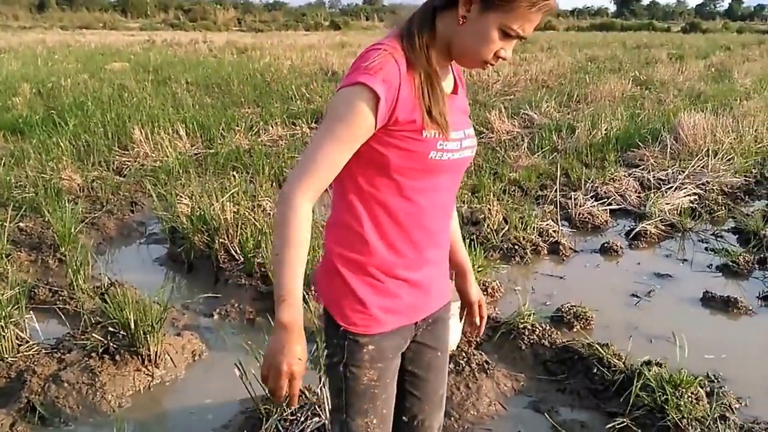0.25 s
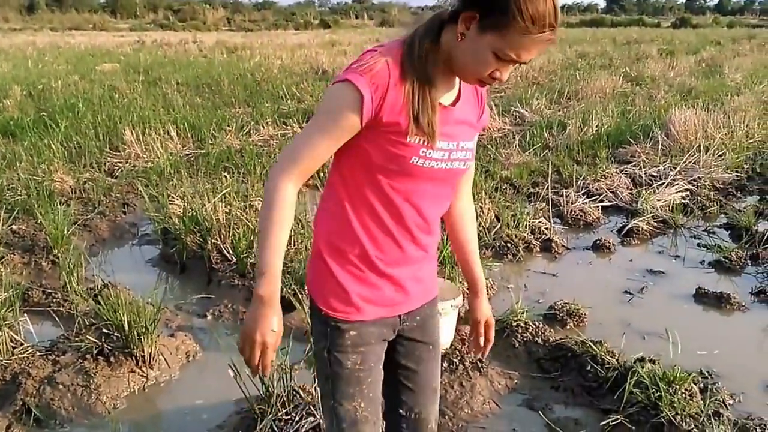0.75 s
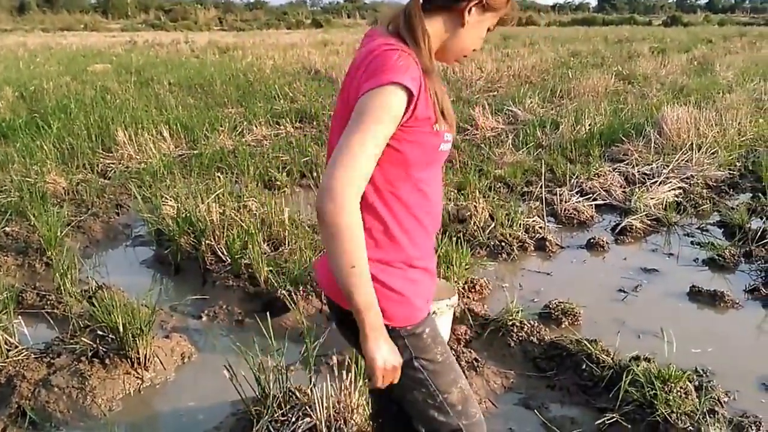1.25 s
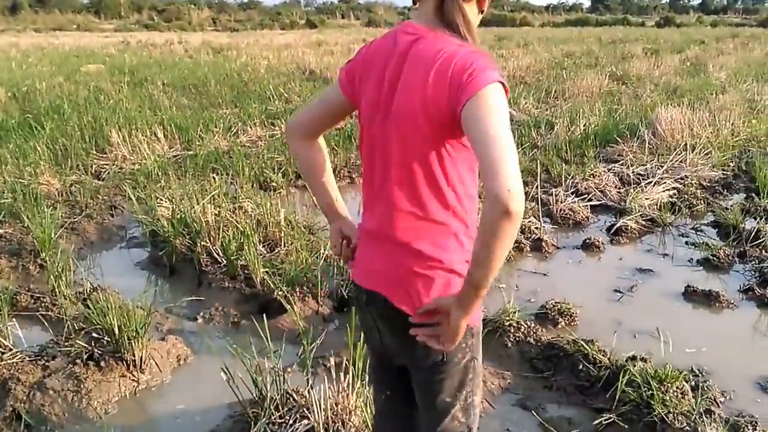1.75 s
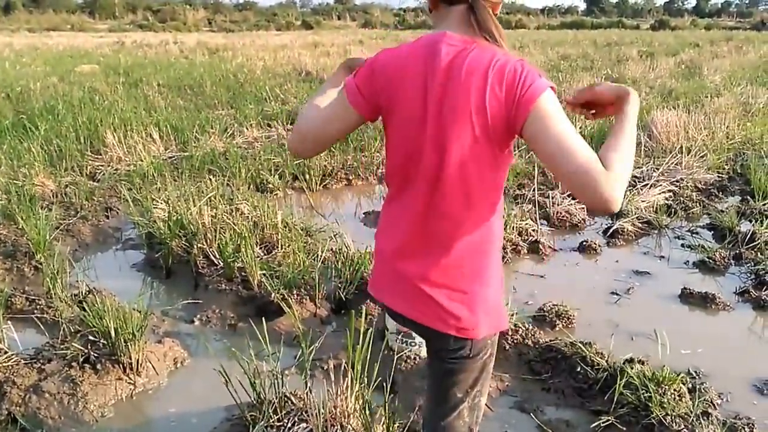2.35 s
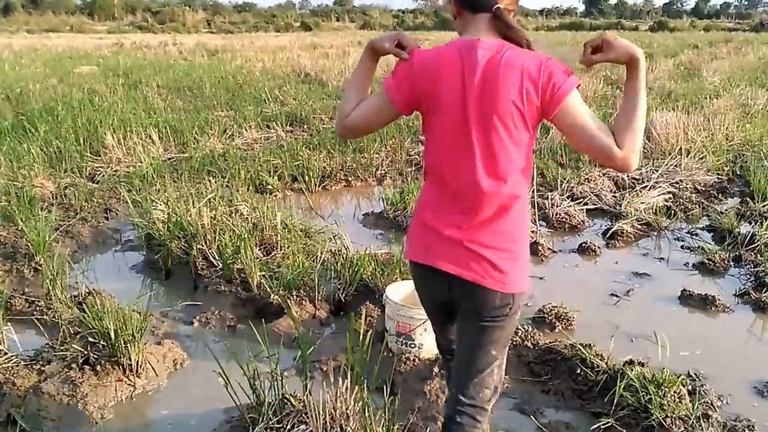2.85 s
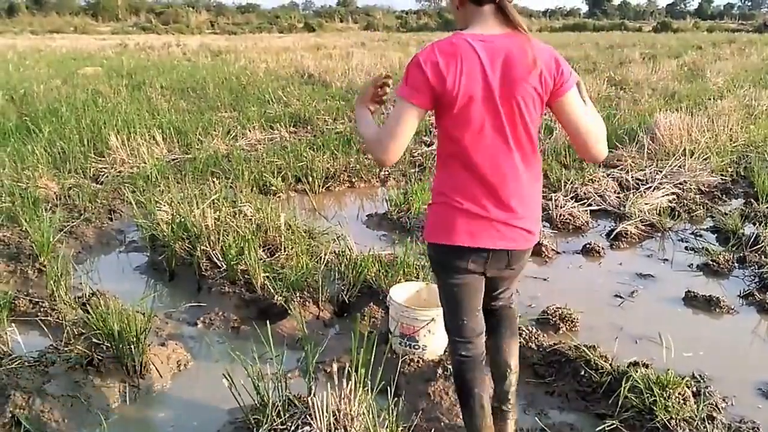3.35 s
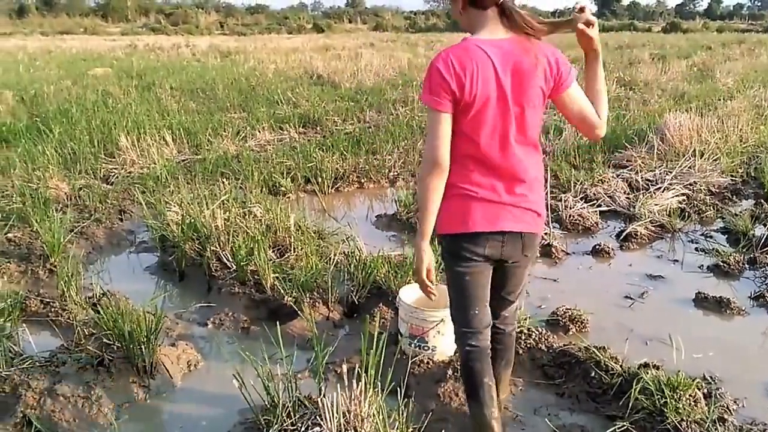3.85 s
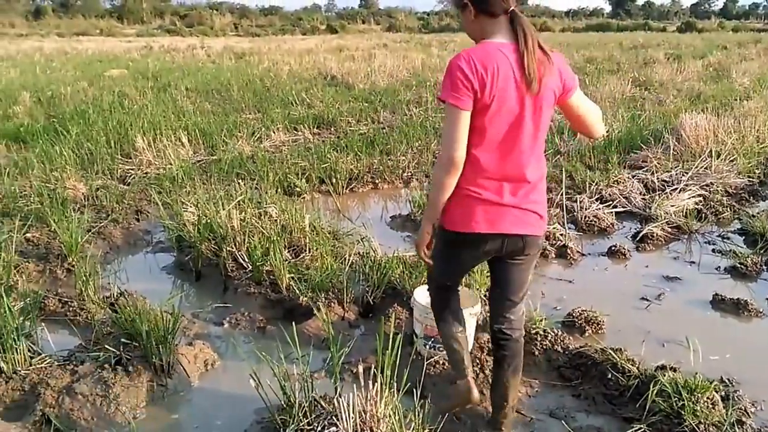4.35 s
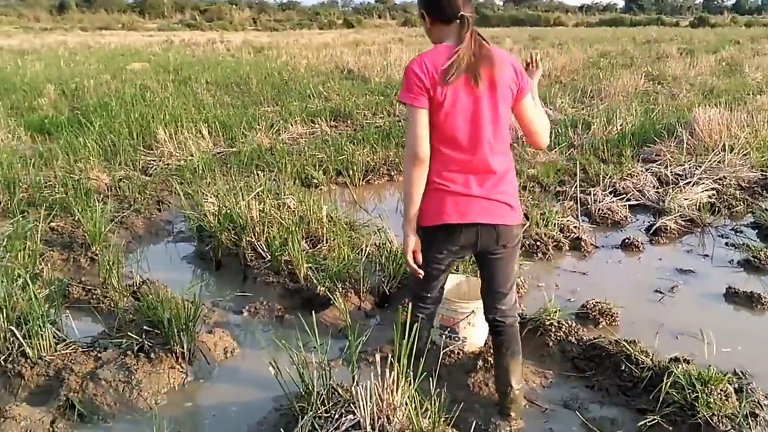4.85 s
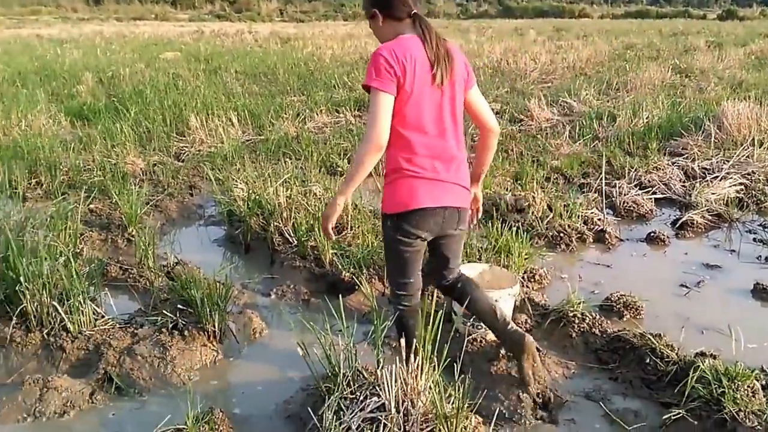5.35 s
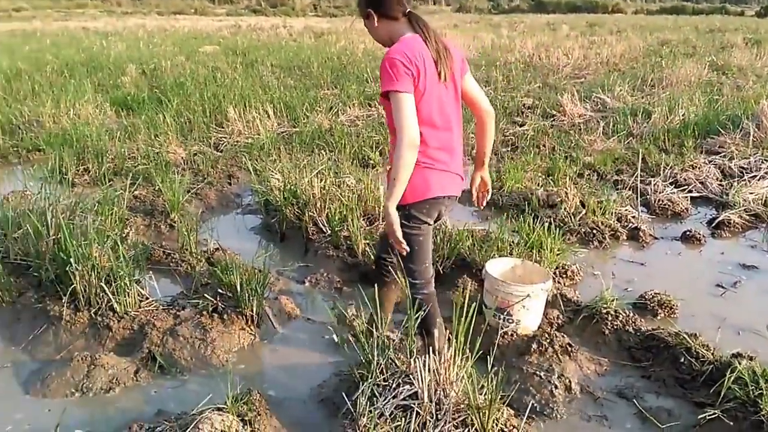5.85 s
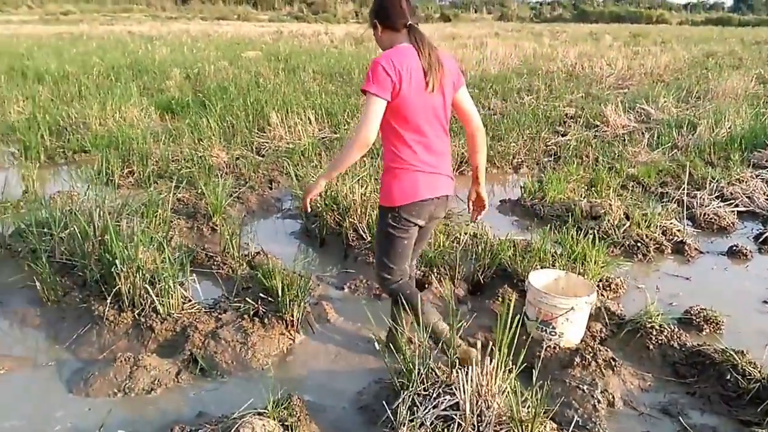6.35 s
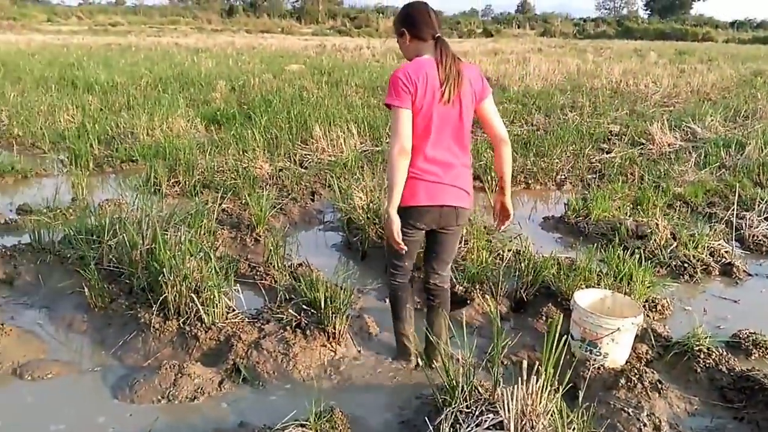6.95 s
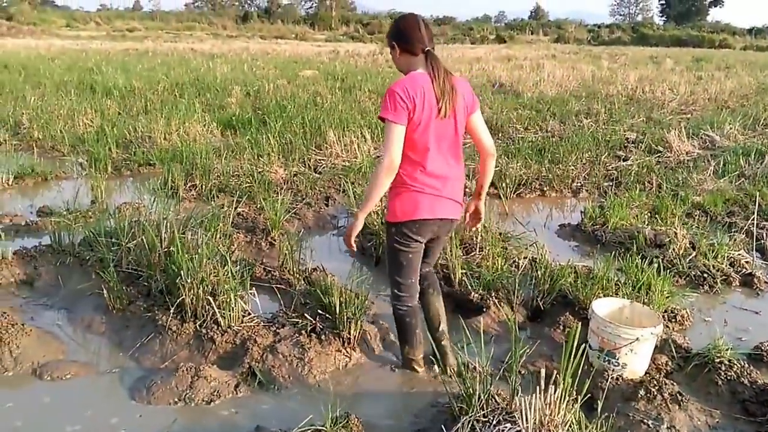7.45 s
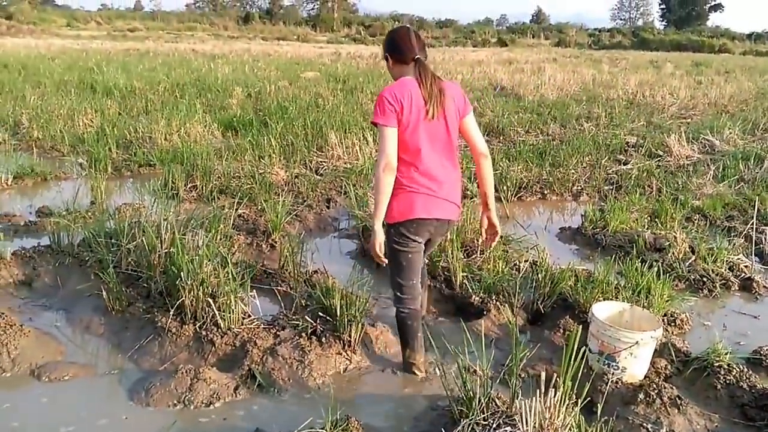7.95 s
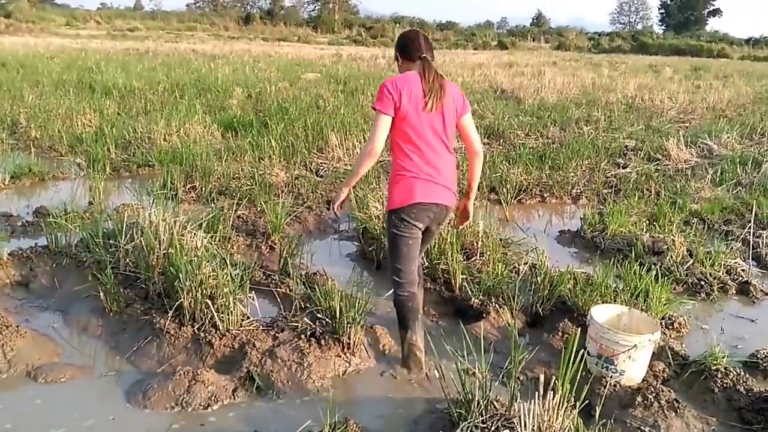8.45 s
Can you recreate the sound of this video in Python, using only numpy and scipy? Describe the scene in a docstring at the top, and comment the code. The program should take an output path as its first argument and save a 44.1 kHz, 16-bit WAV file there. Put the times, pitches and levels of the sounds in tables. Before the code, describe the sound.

Someone wades slowly through shallow, muddy water in an open field. A busy cluster of sloshes, hollow plops and sharp wet smacks comes early, then sparser steps with small drips and bubble snaps. Thin bird trills recur, and a lively twitter builds from about three seconds. Faint insects hiss and wind thumps softly on the close outdoor microphone.

```python
"""Wading through a flooded field

Feet slosh in shallow water, mud sucks and smacks: swarms of ringing bubbles, single air pockets, noise bursts.
Wind buffets the microphone as low filtered noise with single pressure dips; field, air and insects are
shaped noise. Birds twitter, trill, cheep and pip as gliding tones with short diffuse tails."""
import sys
import numpy as np
from scipy import signal
from scipy.fft import rfft, irfft
from scipy.io import wavfile
from scipy.ndimage import uniform_filter1d, map_coordinates

SR = 44100
rng = np.random.default_rng(int(sys.argv[2]) if len(sys.argv) > 2 else 0)


def generate_wav(sig):
    """Save sig (samples, or channels by samples) to the path in sys.argv[1] as 16-bit PCM at SR."""
    pcm = np.round(np.clip(np.atleast_2d(sig).T, -1, 1) * 32767).astype(np.int16)
    wavfile.write(sys.argv[1], SR, pcm)


N = 383669
TIME = np.arange(N) / SR


def from_db(db):
    """Amplitude factor of a level in dB."""
    return 10 ** (np.asarray(db) / 20)


def rms_one(x):
    """Scale to rms 1."""
    return x / np.sqrt(np.mean(x ** 2) + 1e-20)


def in_time(rows):
    """Each column of a curve, interpolated at every sample."""
    knot_s, *columns = np.transpose(rows)
    return [np.interp(TIME, knot_s, column) for column in columns]


def add(out, start_s, sound):
    """Mix a sound in at start_s."""
    at = int(np.clip(round(start_s * SR), 0, N))
    out[at:at + len(sound)] += sound[:N - at]


def colour(x, spectrum):
    """Causal (minimum-phase) filter with the given spectrum; rms 1."""
    size = 16384
    hz, db = np.transpose(spectrum)
    log_hz = np.log(np.maximum(np.fft.rfftfreq(size, 1 / SR), 1))
    below = np.maximum(np.log(hz[0]) - log_hz, 0)
    above = np.maximum(log_hz - np.log(hz[-1]), 0)
    level_db = np.interp(log_hz, np.log(hz), db) - 30 * (below + above)
    # folding the cepstrum makes the phase minimum
    cepstrum = irfft(np.log(from_db(level_db)), size)
    cepstrum[1:size // 2] *= 2
    cepstrum[size // 2 + 1:] = 0
    response = irfft(np.exp(rfft(cepstrum)), size)
    return rms_one(signal.oaconvolve(x, response)[:N])


def noise(spectrum):
    """Random noise with the given spectrum; rms 1."""
    return colour(rng.standard_normal(N), spectrum)


def even(x, span_s):
    """Level held near rms 1 over a sliding span."""
    power = uniform_filter1d(x ** 2, max(int(span_s * SR), 2))
    return x / np.sqrt(np.abs(power) + 1e-6)


def drift(rate_hz):
    """Smooth chance through about rate_hz random knots a second; spread near 1."""
    knots = rng.standard_normal(4000)
    coarse = map_coordinates(knots, [TIME[::32] * rate_hz], order=3, mode="wrap")
    return coarse.repeat(32)[:N]


def glide(hz):
    """Sine following a frequency curve."""
    return np.sin(2 * np.pi * np.cumsum(hz) / SR)


def bubble(start_hz, end_hz, length_s, attack=0.074, damping=3.75):
    """An air pocket rings and dies, its pitch moving as it nears the surface."""
    u = np.arange(int(2 * length_s * SR) + 2) / (length_s * SR)
    swell = np.sin(np.pi / 2 * np.minimum(u / attack, 1)) ** 2
    hz = start_hz * (end_hz / start_hz) ** np.minimum(u, 1.3)
    return glide(hz) * swell * np.exp(-damping * u * u)


def note(length_s, start_hz, middle_hz, end_hz, vary=0.013):
    """A bird's near-pure note bending through three pitches, all shifted by chance."""
    u = np.linspace(0, 1, int(length_s * SR))
    bend = np.polyfit([0, .5, 1], [start_hz, middle_hz, end_hz], 2)
    hz = np.polyval(bend, u) * (1 + vary * rng.standard_normal())
    return glide(hz) * np.sin(np.pi * u)


def scatter(x, t60_s, wet_db):
    """Adds a short diffuse tail of decaying noise."""
    t = np.arange(SR // 2) / SR
    tail = rng.standard_normal(len(t)) * from_db(-60 * t / t60_s) * (t > .004)
    return x + from_db(wet_db) * signal.fftconvolve(x, tail / np.linalg.norm(tail))[:N]


# Light air between gusts. Each row: time in seconds, relative rumble level in dB.
BREEZE_CURVE = [(0.0, -45), (0.34, -53.5), (4.02, -52), (4.24, -46.5), (6.08, -58), (6.3, -45), (7.53, -48),
                (7.88, -59), (8.7, -53)]
# Gusts on the microphone. Each row: peak time in seconds, length in seconds (1/e width of power),
# relative rumble level in dB, turbulence against rumble in dB.
GUST_EVENTS = [(0.01, 0.033, -38, -11.5), (0.132, 0.056, -32.5, -17), (0.35, 0.066, -43, -20),
               (0.552, 0.061, -42, -17), (0.902, 0.089, -44.5, -13.5), (1.54, 0.064, -49, -6.5),
               (1.83, 0.11, -49, -22), (1.981, 0.034, -41.5, -25), (2.335, 0.054, -61, -33),
               (2.703, 0.05, -36.5, -5), (2.994, 0.16, -47.5, -16), (3.333, 0.054, -46.5, -14),
               (3.522, 0.033, -47.5, -18), (3.74, 0.053, -44.5, -13), (3.863, 0.041, -43, -19),
               (4.218, .15, -39, -13.5), (4.41, 0.096, -39, -11.5), (4.723, 0.062, -37, -16.5),
               (4.928, 0.13, -44.5, -7.5), (5.529, 0.076, -47.5, -29), (6.204, .16, -38, -27),
               (6.458, 0.1, -36.5, -14), (6.605, 0.1, -33, 1.5), (6.908, 0.021, -38.5, -26),
               (7.126, 0.075, -29, -4), (7.385, 0.047, -36.5, -0.5), (7.455, 0.13, -37.5, -7),
               (7.934, 0.029, -48.5, 1.5), (8.301, 0.093, -44, -4), (8.526, 0.042, -43, -15)]


def gusting():
    """Levels of rumble and turbulence: bell-shaped gusts ride on a fluttering breeze."""
    breeze_db = in_time(BREEZE_CURVE)[0] - 0.5 + 3.5 * drift(12)
    rumble = from_db(breeze_db) ** 2
    rough = rumble * from_db(-16) ** 2
    for peak_s, length_s, db, rough_db in GUST_EVENTS:
        near = np.abs(TIME - peak_s) < 2 * length_s
        power = from_db(db) ** 2 * np.exp(-(2 * (TIME[near] - peak_s) / length_s) ** 2)
        rumble[near] += power
        rough[near] += power * from_db(rough_db) ** 2
    return np.sqrt([rumble, rough])


# Spectrum of the wind's rumble. Each row: frequency in Hz, relative level in dB per Hz.
RUMBLE_SPECTRUM = [(22, -45.5), (32, -13.5), (45, -9.5), (58, -0.5), (75, -8.5), (110, -18.5), (150, -27),
                   (250, -48.5)]
# Spectrum of the wind's turbulence. Each row: frequency in Hz, relative level in dB per Hz.
TURBULENCE_SPECTRUM = [(80, -26), (130, 9), (190, -4), (260, -10.5), (360, -17.5), (500, -30.5), (900, -31)]
# Hardest eddies thumping the microphone. Each row: time in seconds, relative peak in dB, width in seconds.
BUFFET_EVENTS = [(2.684, -27.5, 0.0038), (2.715, -24.5, 0.0033), (3.323, -31.5, 0.0058),
                 (6.556, -24.5, 0.0018), (6.621, -23, 0.0015), (7.101, -27.5, 0.00065),
                 (7.127, -17, 0.0012), (7.15, -22.5, 0.0014)]


def wind():
    """Lumpy low rumble, rougher turbulence in the gusts, and single pressure dips."""
    rumble, rough = gusting()
    out = from_db(0.56) * rumble * even(noise(RUMBLE_SPECTRUM), 0.0685)
    out += from_db(-6.0) * rough * even(noise(TURBULENCE_SPECTRUM), 0.073)
    for centre_s, db, width_s in BUFFET_EVENTS:
        u = np.arange(-4, 4, 1 / (width_s * SR))
        dip = (u * u - 1) * np.exp(-u * u / 2)
        add(out, centre_s - 4 * width_s, from_db(db - 1.5) * dip)
    return out


# Spectrum of the distant field. Each row: frequency in Hz, relative level in dB per Hz.
FIELD_SPECTRUM = [(150, 1), (420, -13), (680, -7), (930, -4), (1100, -13.5), (1500, -16), (2300, -20.5),
                  (3000, -15.5), (4200, -29), (5300, -12.5), (6600, -29)]
# Swell of the background. Each row: time in seconds, field change in dB, insect change in dB.
BACKGROUND_SWELL = [(0, 2, -3), (1.2, 3.5, 3.5), (2.1, -1.5, -1), (3.0, 6, 0), (3.8, 3, 1),
                    (4.8, 5.5, -4.5), (6, 9, 0.5), (7.3, 9, 1.5), (8.7, 3, -1.5)]


def field():
    """Distant field: shaped noise, slowly swelling."""
    return from_db(-77.5 + in_time(BACKGROUND_SWELL)[0]) * noise(FIELD_SPECTRUM)


# Spectrum of the insect hiss. Each row: frequency in Hz, relative level in dB per Hz.
INSECT_SPECTRUM = [(5500, -19.5), (6800, -12), (7700, -9.5), (8700, 3.5), (9700, -11), (10500, -7.5),
                   (11800, -19.5), (14400, -27.5)]
# Bush cricket buzzes. Each row: start in seconds, length in seconds, relative level in dB.
BUZZ_EVENTS = [(0.0, .13, -81), (0.685, 0.2, -66.5), (3.593, 0.21, -65), (3.883, 0.23, -65),
               (4.214, 0.12, -66)]
# Spectrum of a buzz. Each row: frequency in Hz, relative level in dB per Hz.
BUZZ_SPECTRUM = [(6200, -73), (7100, -26), (7800, -12.5), (8300, -14), (9200, -45)]


def insects():
    """A high hiss from all over the grass, pulsed by wing strokes, and a few nearer buzzes."""
    buzz = np.zeros(N)
    for start_s, length_s, db in BUZZ_EVENTS:
        add(buzz, start_s, from_db(db) * signal.windows.tukey(int(length_s * SR), .7))
    stroke_hz = 98 * (1 + 0.0505 * drift(13))
    strokes = from_db(1.3 * glide(stroke_hz))
    chorus_db = -72 + in_time(BACKGROUND_SWELL)[1] + 2.1 * drift(22) + 0.83 * drift(11)
    around = from_db(-11) * noise(INSECT_SPECTRUM) * np.array([[1], [-1]])  # opposite in the two ears
    chorus = from_db(chorus_db) * (strokes * noise(INSECT_SPECTRUM) + around)
    return chorus + buzz * strokes * noise(BUZZ_SPECTRUM)


# Spectrum of a thin airy hiss. Each row: frequency in Hz, relative level in dB per Hz.
AIR_SPECTRUM = [(2800, -46), (4500, -13), (7000, 0.5), (8700, -2), (11000, 8), (14400, -1.5)]


def air():
    """Thin steady hiss, independent noise in each ear."""
    return from_db(-85.5) * np.array([noise(AIR_SPECTRUM), noise(AIR_SPECTRUM)])


def grains(per_s, low_hz, high_hz, cycles, spread_db, wash):
    """A swarm of small rising bubbles of random size over a smooth wash."""
    out = np.zeros(N)
    for when, pitch, size, rise in rng.random((int(per_s * N / SR), 4)):
        hz = low_hz * (high_hz / low_hz) ** pitch
        strength = from_db(spread_db * min(-np.log(1 - size), 3.5))
        length_s = cycles * (0.55 + 2.7 * rise) / hz
        add(out, when * N / SR, strength * bubble(hz, hz * (1 + 0.31 * rise), length_s))
    return rms_one(out) + wash * rng.standard_normal(N)


STROKE_ATTACK_S, STROKE_RELEASE_S = 0.031, 0.019
RUNOFF_DB, RUNOFF_S = -7.5, 0.12


def stroke(t, start_s, length_s):
    """A push builds quickly, holds, falls away and leaves water draining off the leg."""
    rise = np.clip((t - start_s) / STROKE_ATTACK_S + .5, 0, 1)
    after_s = np.maximum(t - start_s - length_s, 0)
    release = np.exp(-after_s / STROKE_RELEASE_S)
    runoff = from_db(RUNOFF_DB) * np.exp(-after_s / RUNOFF_S)
    return rise * np.maximum(release, runoff)


# A leg pushes through the water. Each row: start in seconds, length in seconds, relative level in dB,
# spray against body in dB, gurgle against body in dB (both before the layer trims).
STROKE_EVENTS = [(0.68, 0.055, -79, -13, 27.5), (0.779, 0.038, -54.5, 0, -7), (1.016, 0.1, -68, 6, -6),
                 (1.156, 0.17, -69.5, -2, 5.5), (1.248, 0.037, -54, -4.5, -4), (1.328, 0.059, -49, -9, -17),
                 (1.402, 0.13, -57, 4.5, 5.5), (1.495, 0.076, -52, 3, 6.5), (1.618, 0.058, -51, -5, 9),
                 (2.264, 0.09, -57.5, 0, -0.5), (2.339, 0.15, -60.5, 2, -12), (2.698, 0.012, -65, 12, 9.5),
                 (2.817, 0.075, -64, 5.5, 9), (3.183, 0.2, -61, 6, -3), (3.35, .21, -76, 16, 4),
                 (3.569, 0.014, -59.5, 13.5, 11.5), (3.61, .19, -74.5, 12, 9.5),
                 (4.314, 0.033, -69.5, 15.5, 6), (4.778, 0.18, -66.5, 0.5, 3),
                 (5.005, 0.065, -73.5, 13.5, 13), (5.123, 0.047, -70.5, 10.5, 4),
                 (5.31, 0.12, -68.5, 10.5, 4), (5.453, 0.13, -64.5, 4.5, 6.5), (5.801, .08, -56, 4.5, -12),
                 (5.899, 0.068, -54.5, -1, 5), (6.09, .065, -54, 6, -14), (6.462, 0.22, -73, 11.5, 4),
                 (6.666, 0.063, -55.5, 2, -17), (6.756, .15, -54, 2, -16), (6.909, 0.09, -57.5, 3.5, -27),
                 (7.615, 0.22, -73, 12.5, 14), (7.848, 0.056, -54.5, 4, 9), (7.923, .06, -73, -1, 18.5),
                 (8.007, 0.072, -57.5, 2, -1)]


def stirring():
    """Levels of body, spray and gurgle: all strokes add in power over a faint trickle."""
    t = TIME[::32]
    body, spray, gurgle = from_db(-86) ** 2, from_db(-80) ** 2, 0
    for start_s, length_s, db, spray_db, gurgle_db in STROKE_EVENTS:
        power = (from_db(db) * stroke(t, start_s, length_s)) ** 2
        body = body + power
        spray = spray + power * from_db(spray_db) ** 2
        gurgle = gurgle + power * from_db(gurgle_db) ** 2
    return [np.interp(TIME, t, np.sqrt(power)) for power in (body, spray, gurgle)]


# Middle range of the water. Each row: frequency in Hz, relative level in dB per Hz.
SLOSH_SPECTRUM = [(450, -16), (850, -15.5), (1020, -8), (1270, -5.5), (1510, -8.5), (1900, 7.5), (2300, -7),
                  (2700, -10.5), (4000, -7.5)]
# Fine droplets. Each row: frequency in Hz, relative level in dB per Hz.
SPRAY_SPECTRUM = [(2000, -12.5), (3000, -10.5), (4300, -1), (5700, 3), (6400, -9), (7300, -20.5),
                  (8800, -14), (14000, -22)]
# Big air pockets. Each row: frequency in Hz, relative level in dB per Hz.
GURGLE_SPECTRUM = [(180, -6.5), (300, -15.5), (480, -8.5), (780, 2.5), (1000, -11), (1600, -18)]


def wading():
    """Moving legs stir up gurgles, mid-sized bubbles and a fizz of droplets."""
    body_level, spray_level, gurgle_level = stirring()
    # gentle motion gives single drips, a hard push merges them
    wash = np.interp(20 * np.log10(body_level), [-66, -55], [.25, .85])
    bubbles = grains(per_s=750, low_hz=600, high_hz=3600, cycles=10, spread_db=4.8, wash=wash)
    droplets = grains(per_s=1100, low_hz=2400, high_hz=9000, cycles=11, spread_db=5.2, wash=wash)
    pockets = grains(per_s=260, low_hz=250, high_hz=1100, cycles=6, spread_db=3.5, wash=.7)
    drips = grains(per_s=55, low_hz=1100, high_hz=3000, cycles=14, spread_db=2.5, wash=0)
    slosh = from_db(-1.5) * even(colour(bubbles, SLOSH_SPECTRUM), 0.048)
    body = body_level * (slosh + from_db(-9) * colour(drips, SLOSH_SPECTRUM))
    spray = from_db(-4.0) * spray_level * even(colour(droplets, SPRAY_SPECTRUM), .05)
    gurgle = from_db(-10.0) * gurgle_level * even(colour(pockets, GURGLE_SPECTRUM), 0.075)
    lumps = from_db(2.5 * drift(60))  # water breaks unevenly
    return lumps * (body + spray + gurgle)


# Far piping call. Each row: first pip in seconds, number of pips, relative level in dB.
PIPING_CALLS = [(0.019, 4, -60), (0.42, 3, -68.5), (4.91, 8, -65), (6.357, 9, -57.5), (7.274, 3, -52.5),
                (7.586, 11, -52.5)]
PIP_GAP_S, PIP_UNEVEN_DB = .1, 1.5


def piping():
    """Hoarse low pips, ten a second: a slightly rising tone with a shorter rasp of noise."""
    tone, rasp = np.zeros(N), np.zeros(N)
    for start_s, pips, db in PIPING_CALLS:
        for k in range(int(round(pips))):
            pip_s = start_s + k * PIP_GAP_S
            gain = from_db(db + PIP_UNEVEN_DB * rng.standard_normal())
            add(tone, pip_s, gain * note(0.029, 1376, 1483, 1526, vary=0.0082))
            add(rasp, pip_s, gain * np.hanning(int(0.022 * SR)))
    hoarse = noise([(850, -6), (1300, 6), (1600, -4.5), (2100, -38.0), (3100, -16), (3700, -28)])
    return scatter(from_db(-4.0) * tone + from_db(-6) * rasp * hoarse, t60_s=0.17, wet_db=0.5)


# Thin high trill of a second bird. Each row: start in seconds, number of notes, relative level in dB.
TRILL_CALLS = [(0.214, 4, -54.5), (0.844, 5, -70), (1.04, 5, -59.5), (1.826, 9, -58), (2.488, 6, -56.5),
               (2.901, 3, -59.5), (3.471, 3, -58.5), (3.679, 5, -55), (4.366, 3, -56.5), (4.614, 4, -58.5),
               (5.137, 3, -59.5), (5.481, 4, -57.5), (6.404, 4, -56.5), (7.349, 4, -53), (7.565, 3, -56),
               (8.185, 4, -57), (8.414, 6, -57.5)]
TRILL_GAP_S, TRILL_JITTER_S, TRILL_NOTE_S = .039, 0.0015, 0.0245


def trill():
    """Quick series of thin, slightly hoarse falling notes; fast level flutter roughens them."""
    out = np.zeros(N)
    for start_s, notes, db in TRILL_CALLS:
        for k in range(int(round(notes))):
            loud, long, late = rng.standard_normal(3)
            note_s = start_s + k * TRILL_GAP_S + TRILL_JITTER_S * late
            length_s = TRILL_NOTE_S * np.exp(0.16 * long)
            add(out, note_s, from_db(db - 3.0 + 2 * loud) * note(length_s, 5708, 5393, 4860, vary=.012))
    return scatter(out * from_db(3.1 * drift(400)), t60_s=0.23, wet_db=-10.0)


# Faint cheeps of far birds. Each row: start in seconds, relative level in dB, middle pitch in Hz.
CHEEP_EVENTS = [(0.245, -72, 3020), (3.096, -63, 3000), (3.914, -62, 2860), (4.015, -64.5, 2980),
                (4.526, -67, 2890), (5.734, -64.5, 3120), (7.61, -69, 2860), (8.401, -74, 3050),
                (8.508, -63, 3040)]


def cheeps():
    """Distance smears these short rising notes almost into noise."""
    out = np.zeros(N)
    for start_s, db, hz in CHEEP_EVENTS:
        add(out, start_s, from_db(db + 0.5) * note(0.014, 0.82 * hz, hz, 1.03 * hz))
    return scatter(out, t60_s=0.17, wet_db=-3)


# Single air pockets ringing. Each row: start in seconds, relative level in dB, start pitch in Hz,
# pitch after one length in Hz, length in seconds.
PLOP_EVENTS = [(0.725, -46.5, 744, 900, 0.0072), (0.778, -39.5, 730, 1170, 0.018),
               (0.783, -35, 1220, 1600, 0.015), (0.798, -34, 790, 990, 0.014),
               (0.856, -42.5, 1480, 1810, 0.0083), (1.026, -39.5, 1490, 1550, 0.0056),
               (1.231, -36.5, 3000, 3080, 0.0055), (1.298, -33, 850, 750, 0.013),
               (1.318, -34, 655, 1040, 0.023), (1.327, -29, 605, 990, 0.024),
               (1.363, -27, 1550, 2160, 0.0065), (1.368, -41, 746, 638, 0.058),
               (1.404, -41, 664, 566, 0.042), (1.533, -36.5, 244, 410, 0.027),
               (1.585, -40.5, 413, 664, 0.028), (1.624, -30, 850, 925, 0.013),
               (2.229, -38.5, 456, 554, 0.006), (2.23, -31.5, 810, 960, 0.0048),
               (2.274, -44, 1600, 1800, 0.014), (2.358, -27, 789, 807, 0.022),
               (2.391, -43.5, 680, 760, 0.021), (2.447, -35.5, 2000, 2520, 0.0055),
               (2.839, -44, 1910, 2010, .01), (3.045, -44.5, 2950, 2860, 0.0077),
               (2.873, -34.5, 262, 574, 0.046), (2.914, -41.5, 573, 1000, 0.027),
               (3.57, -31.5, 1900, 1960, 0.011), (4.774, -43.5, 590, 710, 0.0081),
               (4.794, -36, 1860, 2000, 0.012), (4.824, -35, 1800, 2030, 0.0053),
               (4.865, -28.5, 1810, 2000, 0.01), (5.343, -41.5, 1840, 1960, 0.01),
               (5.468, -39.5, 637, 960, 0.017), (5.554, -41.5, 1900, 1960, 0.0098),
               (6.133, -35, 2080, 1960, 0.0084), (6.239, -39, 745, 825, 0.0088),
               (6.864, -39.5, 764, 880, 0.0093), (6.865, -34.5, 1870, 1900, 0.007),
               (6.891, -35.5, 1110, 1200, 0.0077), (7.631, -49.5, 688, 820, 0.092),
               (7.865, -37, 1250, 1300, 0.0083), (7.881, -36, 1780, 1920, 0.013),
               (7.887, -30.5, 1180, 1310, 0.0079), (7.968, -50, 636, 1000, 0.024)]
# Tiny bubbles snapping at the surface. Each row: start in seconds, relative level in dB, start pitch in Hz.
SNAP_EVENTS = [(1.675, -24, 5400), (2.291, -39.5, 5430), (2.431, -39, 5500), (2.627, -38.5, 3870),
               (3.249, -37.5, 5460), (3.697, -34, 4760), (4.346, -38.5, 4800), (4.7872, -26.5, 4990),
               (4.934, -35, 5300), (5.102, -39, 5170), (5.405, -39.5, 5500), (5.626, -34.5, 5240),
               (6.507, -37.5, 3520), (6.842, -38, 4400), (7.027, -33.5, 4800)]


def plops():
    """Large pockets of air open as a foot sinks in or pulls free; tiny ones snap."""
    out = np.zeros(N)
    for start_s, db, start_hz, end_hz, length_s in PLOP_EVENTS:
        add(out, start_s, from_db(db - 5.5) * bubble(start_hz, end_hz, length_s, attack=0.13, damping=2.0))
    for start_s, db, hz in SNAP_EVENTS:
        add(out, start_s, from_db(db - 5.0) * bubble(hz, hz * 1.15, .003, attack=0.12, damping=1.45))
    return out


# Wet slaps and snapping mud films. Each row: start in seconds, relative level in dB, decay in seconds,
# dull part against bright part in dB (before the layer trims).
SMACK_EVENTS = [(0.796, -51.5, 0.01, 13), (0.951, -38.5, 0.01, -8.5), (1.046, -35, 0.0031, -10),
                (1.483, -31, 0.0046, -17), (1.533, -36.5, 0.0079, 1), (1.546, -34, 0.0036, 3),
                (1.563, -41, 0.0053, 8.5), (1.648, -33, 0.019, -19), (1.676, -23, 0.0019, 0),
                (1.688, -36, 0.015, -2), (2.714, -28, 0.0056, -7.5), (2.865, -34.5, 0.014, -9),
                (3.317, -31, 0.0088, -16), (3.575, -29.5, 0.0045, -6), (3.624, -34.5, 0.017, -10.5),
                (4.771, -34.5, 0.0036, -13), (4.932, -29.5, 0.0036, -11), (5.86, -37.5, 0.033, -8),
                (6.107, -37.5, 0.0081, -8), (6.137, -44, 0.0038, -8), (6.234, -40, 0.0093, -1),
                (6.864, -35.5, 0.0084, -2.5), (6.876, -34.5, 0.013, -10), (7.862, -32, 0.0054, -5),
                (7.887, -31.5, 0.011, -10), (7.899, -20, 0.0033, -24), (7.953, -28, 0.0025, -18)]


def smacks():
    """Short bursts of spray with a duller slap of water beneath."""
    bright, dull = np.zeros(N), np.zeros(N)
    t = np.arange(SR // 10) / SR
    for start_s, db, decay_s, dull_db in SMACK_EVENTS:
        burst = from_db(db) * np.minimum(t / 0.0016, 1) * np.exp(-t / decay_s)
        add(bright, start_s, burst)
        add(dull, start_s, burst * from_db(dull_db))
    low_pass = signal.butter(1, 8000, fs=SR, output="sos")  # gently dulls the burst's top
    dulled = signal.sosfilt(low_pass, noise(SPRAY_SPECTRUM))
    slap = from_db(-7.5) * dull * even(noise(SLOSH_SPECTRUM), 0.0072)
    return from_db(-12) * bright * even(dulled, 0.0033) + slap


# Phrases of a twittering bird. Each row: start in seconds, relative level in dB, number of falling notes
# (rounded), delay of the rising slur in seconds.
TWITTER_PHRASES = [(2.963, -54, 4, 0.067), (3.134, -52.5, 4, 0.063), (3.439, -50.5, 4, 0.032),
                   (3.796, -51, 4, .038), (4.06, -46.5, 4, 0.035), (4.247, -49.5, 4, 0.021),
                   (4.409, -49, 4, .027), (4.55, -50.5, 4, 0.036), (4.667, -51, 6, .018),
                   (4.844, -49.5, 6, 0.086), (5.002, -52.5, 4, 0.034), (5.134, -49, 5, 0.031),
                   (5.303, -50.5, 4, 0.1), (5.446, -50, 4, 0.036), (5.611, -44, 4, 0.032),
                   (5.768, -46, 3, 0.11), (5.956, -51.5, 4, .25), (6.28, -46.5, 5, .087),
                   (6.562, -44, 4, .048), (6.8, -48, 3, 0.046), (7.041, -42.5, 3, 0.044),
                   (7.269, -44, 4, 0.059), (7.525, -43.5, 3, 0.045), (7.77, -42, 3, 0.044),
                   (8.026, -44.5, 6, 0.028), (8.269, -46, 7, 0.037), (8.521, -47, 7.7, 0.033)]
# The slur joins in as the song warms up. Each row: time in seconds, slur against phrase level in dB.
SLUR_CURVE = [(4.1, -16), (4.8, -3.5), (6, -7.5), (8.5, -3)]


def twitter():
    """Runs of steep falling notes swell around a clean rising slur; a softer, higher voice follows."""
    runs, slurs = np.zeros(N), np.zeros(N)
    for start_s, db, notes, delay_s in TWITTER_PHRASES:
        slur_db = db + np.interp(start_s, *np.transpose(SLUR_CURVE))
        # the song settles lower and sharper as it goes on
        top_hz = np.interp(start_s, [4, 7], [5250, 4750])
        length_s = np.interp(start_s, [4, 7], [.012, .008])
        for k in range(int(round(notes))):
            late, loud = rng.standard_normal(2)
            after_s = k * 0.016 + 0.0038 * late
            swell_db = 1 - 8 * np.exp(-k / 2.65)  # a run starts softly
            if 0 < after_s - delay_s < .024 and slur_db > db - 8:
                swell_db -= 8  # the run gives way while the slur is sung
            falling = note(length_s, top_hz, 4175, 3330, vary=0.0316)
            add(runs, start_s + after_s + 0.0024, from_db(db - 1 + swell_db + 2 * loud) * falling)
            upper = note(1.21 * length_s, top_hz + 450, 4920, 4650, vary=0.048)
            add(runs, start_s + after_s + 0.0059, from_db(db - 12.5 + swell_db) * upper)
        add(slurs, start_s + delay_s, from_db(slur_db) * note(0.0269, 3220, 3810, 3730, vary=0.0034))
    beak = signal.butter(1, [3500, 4600], "band", fs=SR, output="sos")
    far_runs = scatter(signal.sosfilt(beak, runs), t60_s=0.11, wet_db=-5.5)
    return far_runs + scatter(slurs, t60_s=0.2, wet_db=-10.5)


def treble_width(water):
    """Very faint, short treble noise tails of the water, independent in each ear."""
    treble = signal.sosfilt(signal.butter(2, 5000, "high", fs=SR, output="sos"), water)
    tails = [scatter(treble, t60_s=0.038, wet_db=-5) - treble for ear in range(2)]
    return from_db(-32) * np.array(tails)


def scene():
    """Water, birds, wind and background summed in two ears."""
    water = scatter(wading() + plops() + smacks(), t60_s=0.12, wet_db=-12.0)
    birds = piping() + trill() + cheeps() + twitter()
    return water + treble_width(water) + birds + wind() + field() + insects() + air()


def record(dry):
    """The deepest rumble is rolled off and the top is cut steeply."""
    low_cut = signal.butter(2, 26, "high", fs=SR, output="sos")
    top_cut = signal.ellip(12, .1, 80, 14450, fs=SR, output="sos")
    return signal.sosfilt(top_cut, signal.sosfilt(low_cut, dry))


dry = scene()
out = record(dry)
generate_wav(out)
```